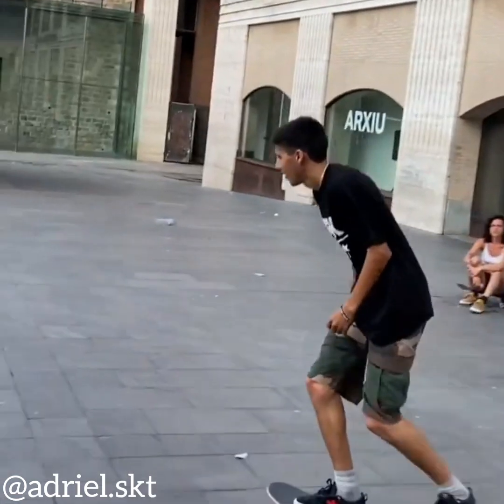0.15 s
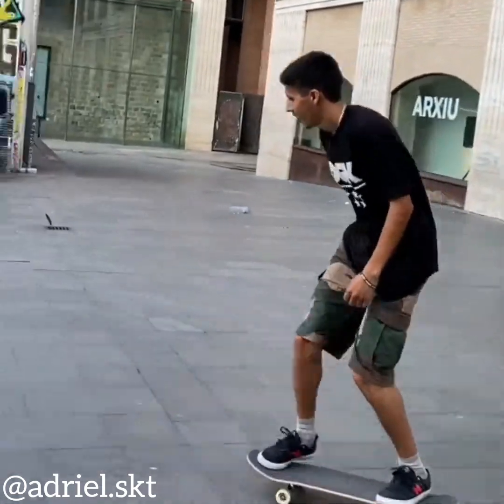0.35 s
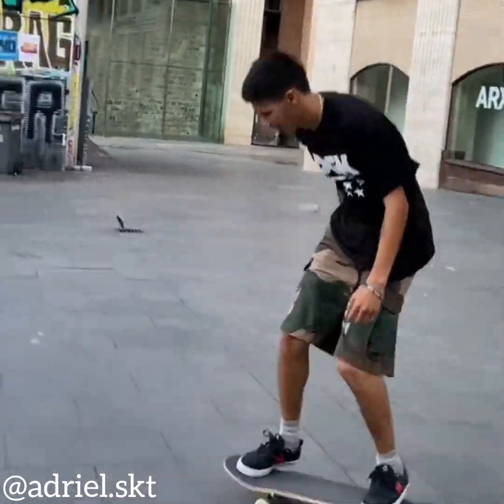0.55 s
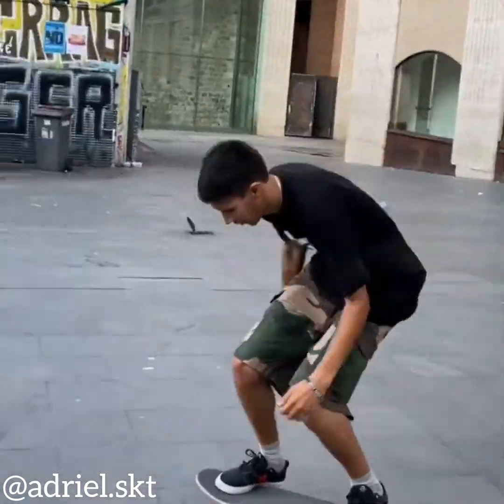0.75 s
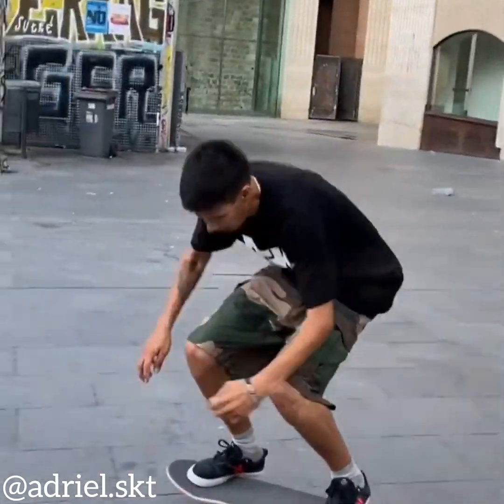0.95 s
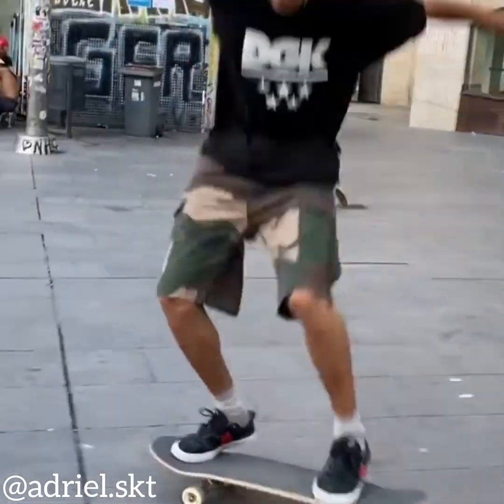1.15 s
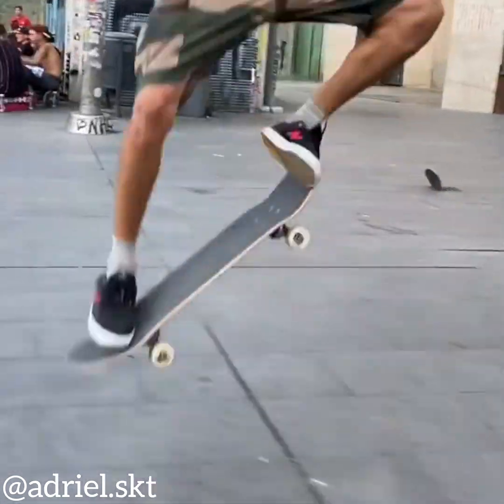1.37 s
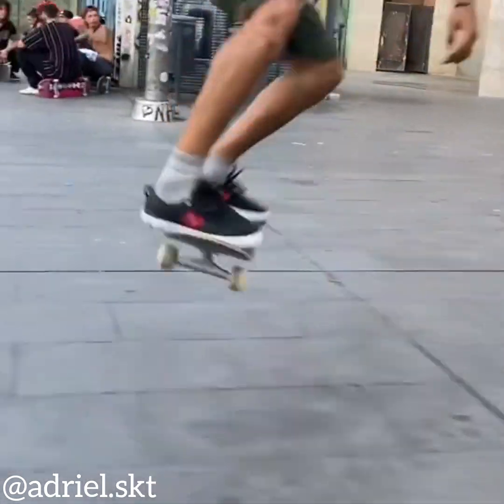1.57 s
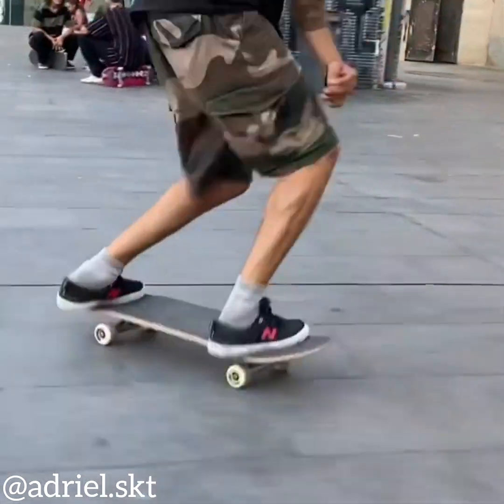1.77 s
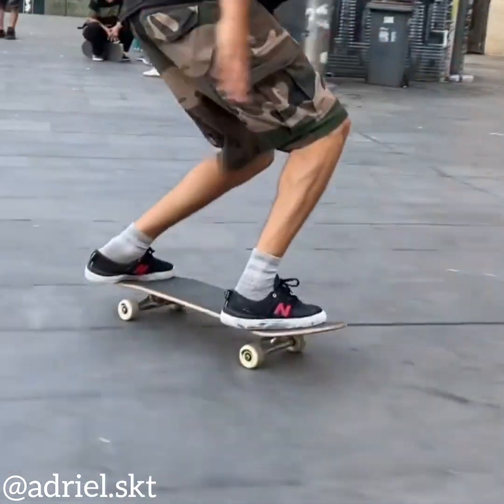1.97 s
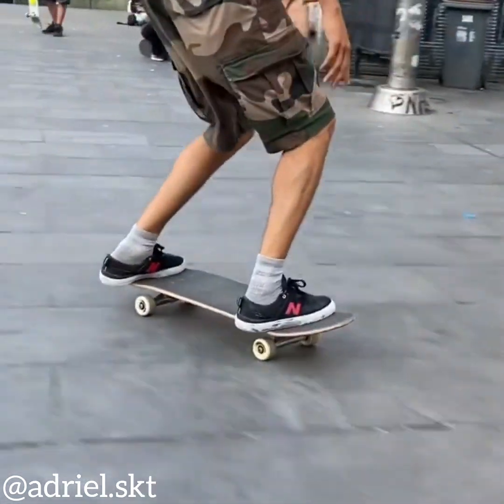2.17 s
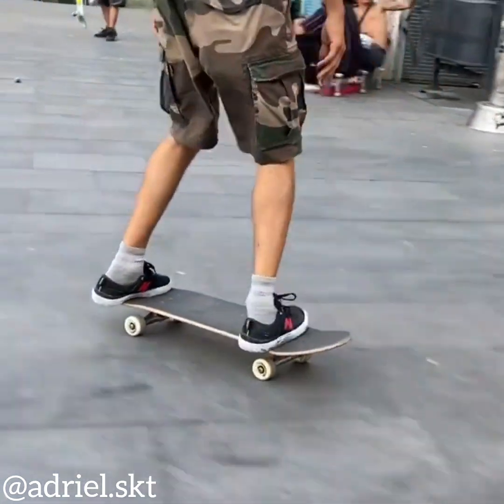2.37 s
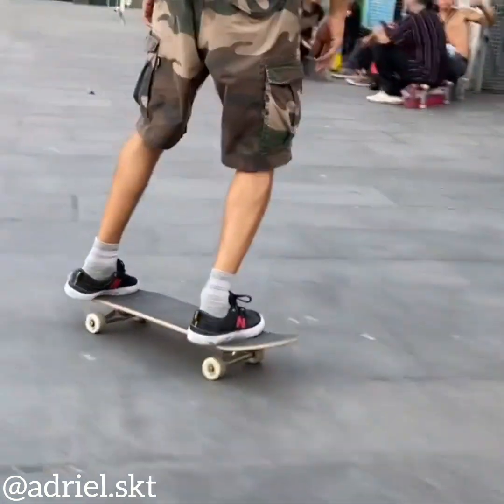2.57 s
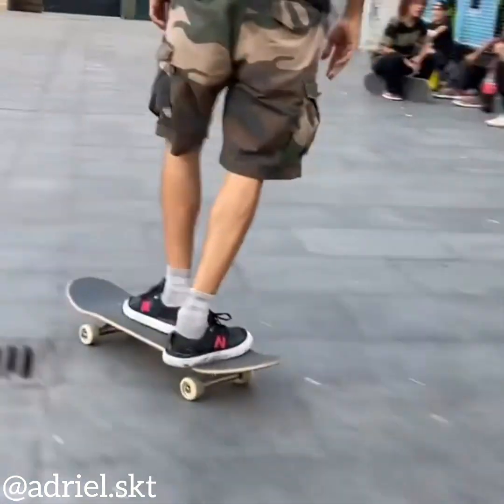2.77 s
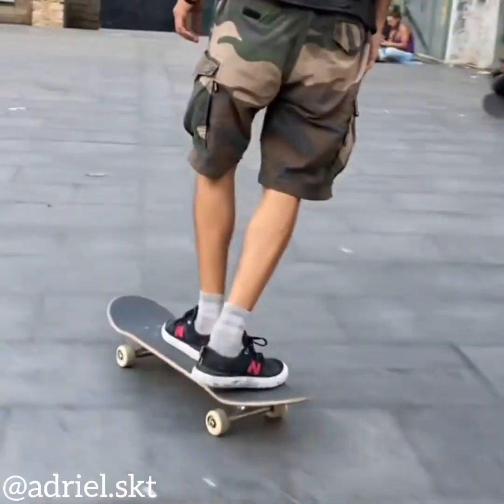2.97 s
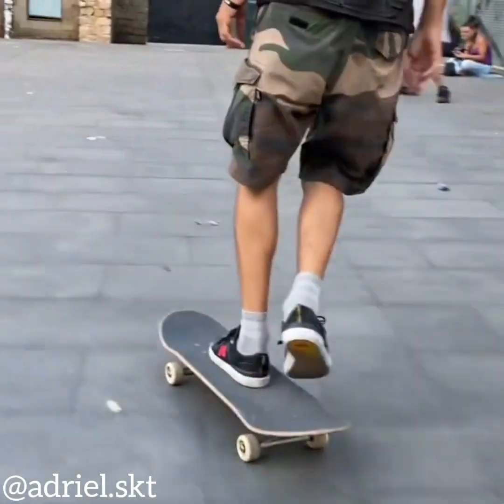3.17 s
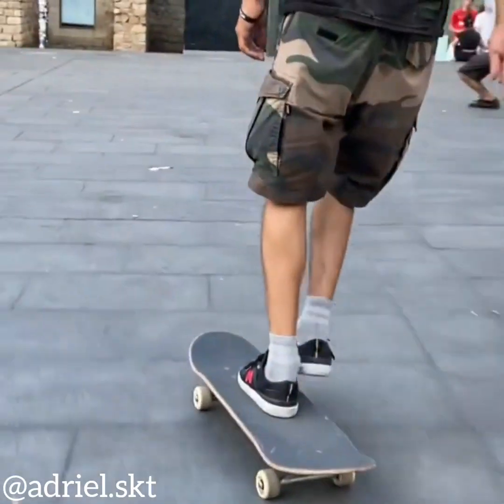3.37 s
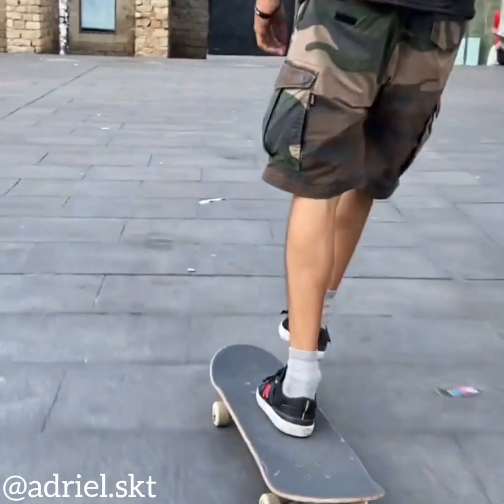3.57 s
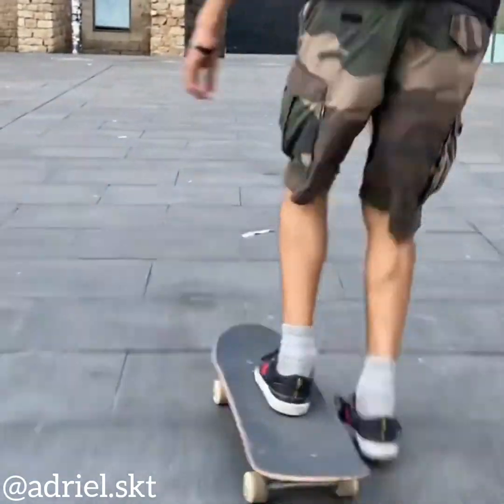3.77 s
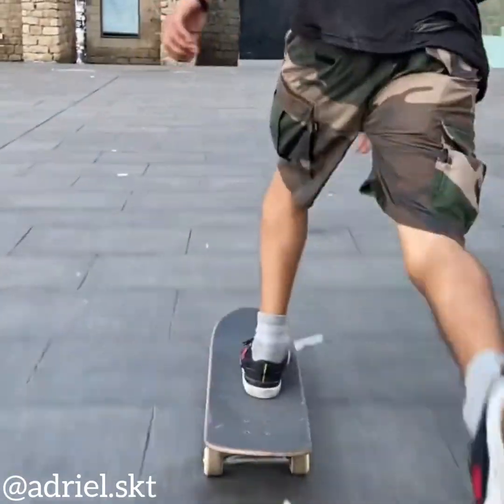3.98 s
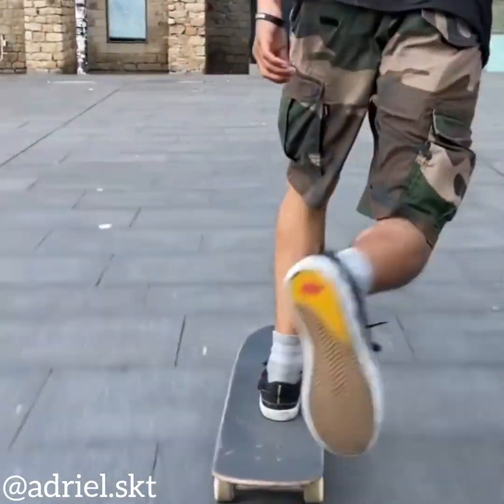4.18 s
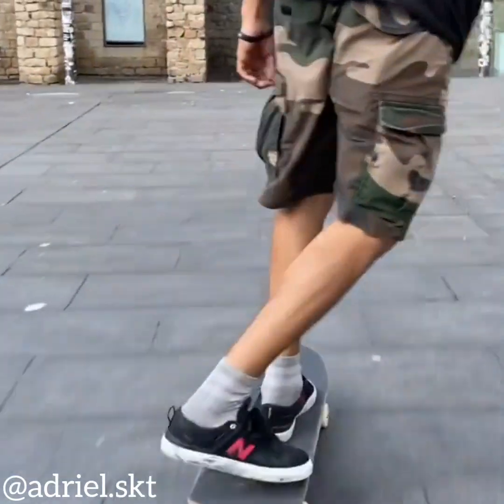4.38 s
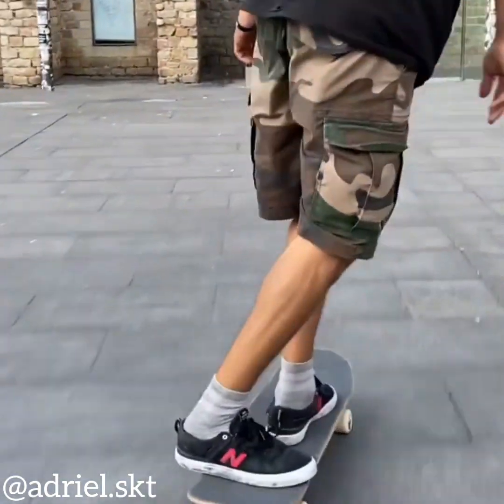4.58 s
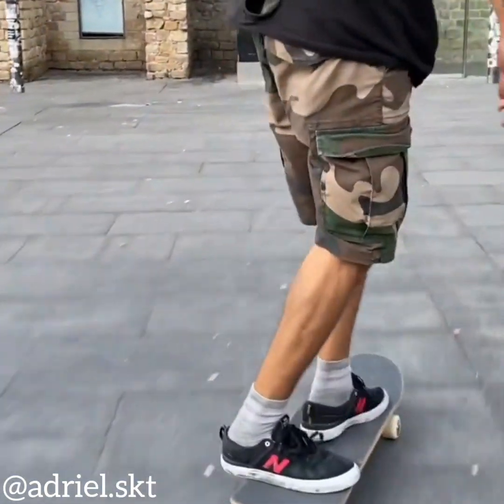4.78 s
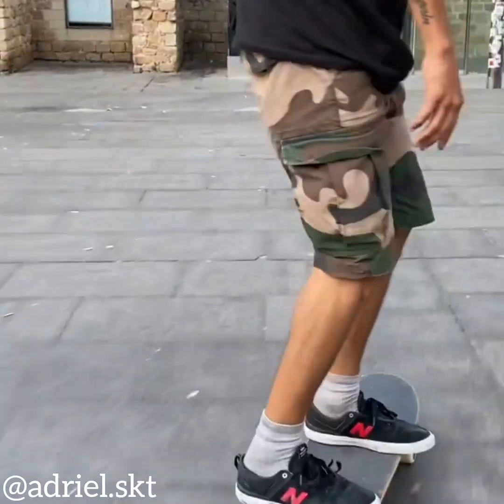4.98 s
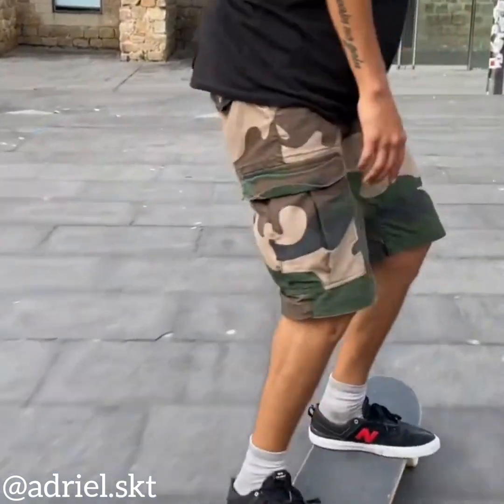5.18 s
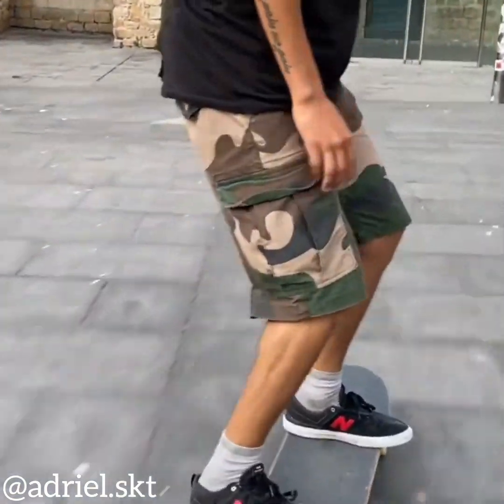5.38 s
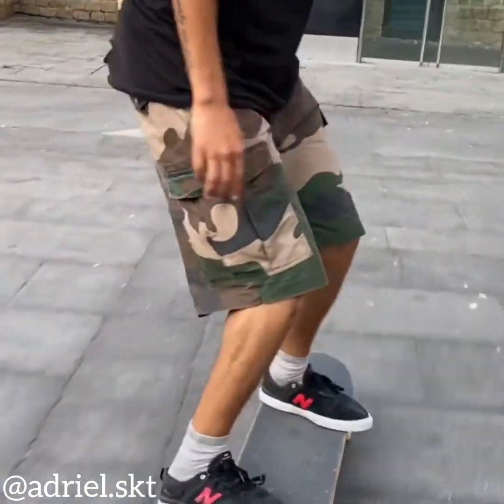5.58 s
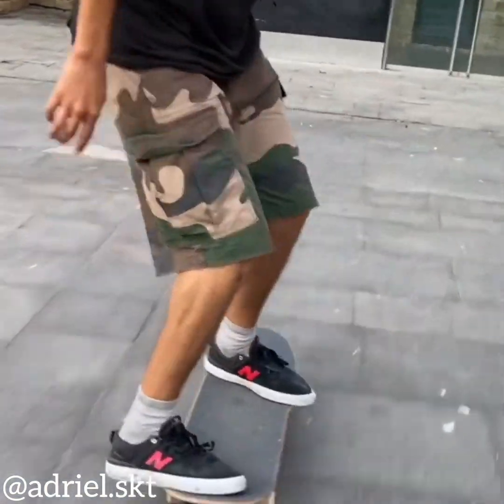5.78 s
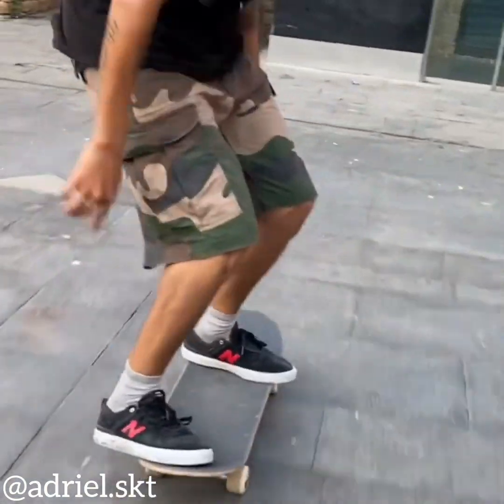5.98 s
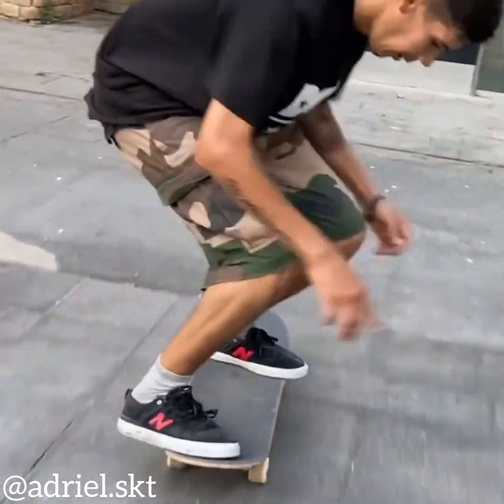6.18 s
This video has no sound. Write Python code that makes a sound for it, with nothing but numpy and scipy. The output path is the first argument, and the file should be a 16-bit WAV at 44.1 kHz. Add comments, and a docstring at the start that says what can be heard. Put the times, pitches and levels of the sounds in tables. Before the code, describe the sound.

Outdoors on a stone plaza, a handheld phone rides with one skateboard while following another. From 0 s hard wheels roll close below, a continuous grainy, woody rumble with light tile clicks around 0.1-0.5 s. Knocks return at about 1.2 s as the rolling swells; at 1.33 s the tail of the board ahead snaps, thin and bright. A few clicks follow, then at 1.76 s it slams flat: a sharp, loud metallic crack with a short woody rebound. Rolling drops briefly and recovers by 2.5 s, with small axle ticks near 2.45 s. From 3.3 to 4.5 s joints knock densely and heavily, with a harder clack at 3.9 s. Afterwards the rolling is duller and lower, with wind buffeting underneath. Metallic ticks and axle buzz from ahead appear at 5.0 s, strongest at 5.52 s, and knocks cluster near 5.7-6.1 s before it ends mid-roll at 6.2 s.

```python
"""Hard skateboard wheels roll over stone paving under a rider who holds a phone and follows a second board.
Stone grain is noise driving the modes of a wooden deck and metal trucks; tile joints knock them with short
bursts. Ahead, axles buzz and tick, a tail pops and a board slams down; the level dips just after and recovers.
Wind of the ride is lumpy low noise, and a thin hiss varies on top, strongest near 5 kHz. Left and right differ
in phase, likeness and level, set by frequency for the board below and the one ahead."""
import sys
import numpy as np
from scipy import signal
from scipy.fft import rfft, irfft, next_fast_len
from scipy.io import wavfile
from scipy.ndimage import uniform_filter1d

SR = 44100
rng = np.random.default_rng(int(sys.argv[2]) if len(sys.argv) > 2 else 0)


def persist_wave(psi):
    """Save psi, clipped to +-1, as 16-bit WAV."""
    counts = np.round(np.clip(psi, -1, 1) * 32767).astype(np.int16)
    wavfile.write(sys.argv[1], SR, np.atleast_2d(counts).T)


N = 275126
FFT_SIZE = next_fast_len(N + 4096)
HZ = np.fft.rfftfreq(FFT_SIZE, 1 / SR)

# resonances of the board's parts: pitch_hz, width_hz, relative level_db
FLEX_MODES = [(168.5, 93, -6), (239.2, 112, -1), (314, 77, 0)]
BELLY_MODES = [(348.3, 101.5, -2.15), (413, 108, -0.86), (488, 29.2, 2)]
DECK_MODES = [(494.3, 33, -0.73), (569.4, 38, -0.7), (636, 44.6, -0.58)]
RAIL_MODES = [(688.6, 72, 1.5), (818.4, 88, -0.58)]
NOSE_MODES = [(997, 110, 1.5), (1090, 67, 6.5), (1164, 172, 2), (1368, 143, -7)]
TRUCK_MODES = [(1424, 260, 6.5), (2290, 570, 3), (2610, 1230, 0), (3830, 1200, -5.5)]
# colour of the wheel hiss: pitch_hz, relative level_db
WHEEL_HISS = [(600, -80), (2500, -25), (4000, -2), (5500, 0), (7200, -3), (8600, .5), (9700, -3.5),
              (12500, -9), (14500, -15), (16000, -22)]
# level of the bass as heard: time_s, deck_flex_db, wind_db
BASS_LEVELS = [(0, -34, -48), (.15, -46.5, -68), (.35, -37, -49), (.5, -43, -75), (1.0, -38.5, -57),
               (1.5, -41.5, -79), (1.85, -46.5, -74), (2.1, -44.5, -86), (2.45, -43, -63),
               (2.8, -39.5, -89), (3.25, -43, -56), (3.45, -40, -61), (3.7, -35, -83), (4.1, -28.5, -54),
               (4.25, -29.5, -34.5), (4.45, -26.5, -39), (4.7, -35.5, -52), (4.9, -30, -39.5),
               (5.25, -31, -44.5), (5.4, -33.5, -34), (5.55, -29.5, -34.5), (5.66, -38.5, -40),
               (5.8, -29, -40), (6.05, -32, -35), (6.24, -38.5, -38)]


def gain_of(db):
    """Decibels to an amplitude factor."""
    return 10 ** (np.asarray(db) / 20)


def evened(x):
    """Scales to rms 1."""
    return x / np.sqrt(np.mean(abs(x) ** 2) + 1e-20)


def read(points):
    """A (pitch_hz, value) table at every frequency, linear in log frequency."""
    f, value = np.transpose(points)
    return np.interp(np.log(HZ + 1), np.log(f + 1), value)


def follow(table):
    """Every column of a (time_s, ..) table at every sample."""
    s, *columns = np.transpose(table)
    return [np.interp(np.arange(N) / SR, s, c) for c in columns]


def lumps(per_s, spread_db):
    """A gain of rms 1 that wanders at random about per_s times a second."""
    width = max(int(SR / per_s), 2)
    wander = uniform_filter1d(rng.standard_normal(N), width)
    wander = evened(uniform_filter1d(wander, width))
    return evened(gain_of(spread_db * wander))


def ringing(modes, reach=1.017):
    """Response of a body: damped modes of alternate sign, deaf well below and above them."""
    rings = sum((-1) ** k * gain_of(db) * width / (width + 1j * (HZ ** 2 - hz ** 2) / hz)
                for k, (hz, width, db) in enumerate(modes))
    low = 1j * HZ * reach / modes[0][0]
    high = 1j * HZ / reach / modes[-1][0]
    highpass = (low ** 2 / (1 + low + low ** 2)) ** 2
    return rings * highpass / (1 + high) ** 2


def through(response, force):
    """Passes a force through a response of unit noise gain."""
    return irfft(rfft(force, FFT_SIZE) * evened(response))[..., :N]


def shaken(response, power):
    """A part driven by a noisy force: a direct field and an unrelated, scattered one."""
    return through(response, np.sqrt(power) * rng.standard_normal((2, N)))


def bent(response, power, pitch):
    """A shaken part whose modes slide by the factor pitch over its mean, by uneven reading."""
    at, n = np.cumsum(pitch), np.arange(N)
    at = at * (N - 1) / at[-1]
    power_before = np.interp(n, at, power)  # lands in time once bent
    return np.array([np.interp(at, n, field) for field in shaken(response, power_before)])


def knocks(rows, column, rise_ms, jolt_db, jolt_ms, sharp):
    """Power envelope of all blows on one part: a quick rise, a jolt and a short rattle."""
    envelope = np.zeros(N + 4000)
    ms = np.arange(4000) * 1000 / SR
    rise = 1 - np.exp(-(ms / rise_ms) ** 2)
    jolt = rise * (1 + gain_of(2 * jolt_db) * np.exp(-(ms / jolt_ms) ** 2))
    for row in rows:
        rattle = np.exp(-(ms / row[-1]) ** sharp)
        envelope[round(row[0] * SR):][:4000] += gain_of(2 * row[column]) * jolt * rattle
    return envelope[:N]


def taps(rows, column, tap_db):
    """One clean one-sample push 1 ms into every blow, its energy in proportion to the blow's length."""
    force = np.zeros((2, N))
    for row in rows:
        at = round((row[0] + .001) * SR)
        force[:, at:at + 1] += gain_of(row[column] + tap_db) * np.sqrt(row[-1] * SR / 1000)
    return force


def struck(rows, metal, rise_ms, jolt_db, jolt_ms, sharp, lag_ms, wheel_db, tap_db, widening, metal_db):
    """Blows reach every part of a board; each rings in its own modes, the wood's widened."""
    # the whole board: pitch_hz, width_hz, relative level_db
    thud_modes = [(35, 40, 0), (62, 79, 0)]
    wood = [(FLEX_MODES, -12), (BELLY_MODES, -7), (DECK_MODES, -3), (RAIL_MODES, -3.5)]  # share_db
    deck, nose = (knocks(rows, column, rise_ms, jolt_db, jolt_ms, sharp) for column in (1, 2))
    trucks = knocks(rows, 3, rise_ms + lag_ms, jolt_db, jolt_ms + lag_ms, sharp)
    on_deck, on_nose, on_trucks = (taps(rows, column, tap_db) for column in (1, 2, 3))

    out = np.zeros((2, N))
    for modes, share_db in wood:
        part = ringing(modes * np.array([1, widening, 1]))
        out += shaken(part, gain_of(2 * share_db) * deck)
        out += through(part, gain_of(share_db) * on_deck)
    out += shaken(ringing(NOSE_MODES), nose) + through(ringing(NOSE_MODES), on_nose)
    out += shaken(ringing(TRUCK_MODES), gain_of(2 * metal_db) * nose)
    out += shaken(ringing(metal), trucks) + through(ringing(metal), on_trucks)
    out += shaken(gain_of(read(WHEEL_HISS)), gain_of(2 * wheel_db) * trucks)
    out += shaken(ringing(thud_modes), gain_of(2 * -30) * trucks)
    return out


def board():
    """Stone grain shakes every part of the rolling board with noise; tables set the level heard."""
    # level of the rolling as heard, dipping after the slam at 1.76 s and recovering:
    # time_s, deck_rails_nose_total_db, belly_db, rails_over_mid_deck_db
    roll = [(0, -18, -20, -2), (.13, -30, -29.5, -3.5), (.24, -21.5, -26, 1), (.3, -22.5, -24.5, 0),
            (.35, -19.5, -19.5, 1), (.41, -27.5, -39, -2), (.48, -17.5, -19, 5.5), (.6, -20.5, -25, -2),
            (.75, -21, -24.5, -1.5), (.9, -21.5, -22.5, 1.5), (.99, -23, -26, 3), (1.05, -21.5, -26, -4),
            (1.18, -20, -24.5, 3), (1.23, -15.5, -23, 2), (1.3, -17.5, -21.5, 2), (1.36, -13.5, -16, -0.5),
            (1.47, -14.5, -28, -6), (1.55, -17, -35, -2.5), (1.65, -20, -27.5, -3),
            (1.755, -16.5, -22.5, -5.5), (1.8, -26.5, -39, 4), (1.9, -23.5, -43, -1.5),
            (2.1, -20.5, -52, -6), (2.35, -23, -39.5, -1), (2.52, -19, -35, -2.5), (2.625, -20.5, -40, -1),
            (2.645, -15.5, -33, -5), (2.85, -17, -29, 2.5), (2.875, -22, -36, 6.5), (2.92, -19.5, -30, 0.5),
            (3.15, -18, -42, 0), (3.45, -18.5, -30.5, 0.5), (3.87, -15.5, -24.5, 2), (4.0, -21.5, -29, 2),
            (4.2, -19.5, -25.5, 7.5), (4.29, -19, -25, 10), (4.45, -25, -37, 4), (4.7, -25.5, -26, 10),
            (4.9, -27.5, -31.5, 9), (5.1, -25, -28.5, 9.5), (5.3, -25, -27, 11.5), (5.6, -25, -28.5, 6),
            (5.9, -27, -26.5, 18), (6.24, -25.5, -28.5, 2)]
    # level of the metal and hiss as heard: time_s, trucks_db, wheel_hiss_db
    treble = [(0, -31.5, -45), (.13, -43, -48), (.45, -35, -46), (.75, -40, -45), (1.15, -41.5, -52.5),
              (1.25, -38, -48.5), (1.29, -39, -43.5), (1.36, -34.5, -41.5), (1.41, -37.5, -51),
              (1.5, -38.5, -52), (1.75, -41, -50.5), (1.82, -40.5, -47), (2.1, -43.5, -49),
              (2.3, -41, -47.5), (2.45, -39, -42), (2.6, -35, -42), (2.66, -34, -40), (2.9, -35, -44.5),
              (3.45, -36, -42.5), (3.87, -27.5, -41.5), (4.0, -38, -48.5), (4.35, -37.5, -45),
              (4.55, -45, -51), (4.8, -43.5, -51), (5.0, -45.5, -52), (5.2, -41, -48.5), (5.38, -44, -50.5),
              (5.55, -38, -48.5), (5.78, -47.5, -50.5), (6.0, -38.5, -47), (6.24, -43, -50.5)]
    # the deck's pitch as the rider's weight shifts: time_s, relative pitch_factor
    stance = [(0, 1.0), (.5, .97), (1.0, .95), (1.35, 1.0), (1.6, 1.06), (1.9, 1.0), (2.05, 1.06),
              (2.35, .97), (2.65, 1.05), (3.0, 1.0), (3.4, 1.04), (3.6, .97), (3.8, 1.03), (4.2, .97),
              (4.8, 1.0), (5.5, .98), (6.24, 1.0)]
    level, belly, rails = follow(roll)
    trucks, hiss = follow(treble)
    flex = follow(BASS_LEVELS)[0]
    nose = -6.5 + 1.42 * rails  # dB over mid deck; leans further than the rails
    deck = level - 10 * np.log10(1 + gain_of(2 * rails) + gain_of(2 * nose))  # the three share the level

    stone = lumps(20, .8)  # rougher and smoother patches under all wheels
    bumps = stone * lumps(73, 0.96)
    grit = lumps(590, 0.26) * lumps(42, 1.12)
    patches = lumps(10.0, 0.84)
    sway = lumps(14, 1.8)  # the deck bends in bouts
    bumps = bumps * lumps(490, 1.28) * lumps(100, 0.8)  # single grains of stone

    parts = [(FLEX_MODES, flex, bumps * sway), (BELLY_MODES, belly, bumps),
             (DECK_MODES, deck, bumps), (RAIL_MODES, deck + rails, bumps), (NOSE_MODES, deck + nose, bumps),
             (TRUCK_MODES, trucks, bumps * grit * patches)]
    pitch = follow(stance)[0]
    body = sum(bent(ringing(modes), (gain_of(db) * grain) ** 2, pitch * lumps(3.5, .15))
               for modes, db, grain in parts)
    return body + shaken(gain_of(read(WHEEL_HISS)), (gain_of(hiss) * stone * grit * patches) ** 2)


def chips():
    """Small chips and cracks in the paving: light knocks at random moments."""
    per_s, spread_db, length_ms = 70, 4, 2
    mean_db = np.array((-42, -40, -53))  # deck, nose, trucks
    draws = rng.random((600, 2))
    start_s = np.cumsum(-np.log(1 - draws[:, 0])) / per_s
    size_db = spread_db * (2 * draws[:, 1] - 1)
    return [(s, *(db + mean_db), length_ms) for s, db in zip(start_s, size_db) if s < N / SR]


def joints():
    """Tile joints and chips knock the board below; its wood and rattling metal ring."""
    # tile joints, levels ahead of each part's share: start_s, deck_db, nose_db, trucks_db, length_ms
    joint_rows = [(0.093, -34, -43, -32, 2.4), (0.136, -38, -22, -24, 2.4), (0.18, -23, -22.5, -43, 9.4),
                  (0.262, -16.5, -23.5, -48, 6.9), (0.336, -20, -43, -54, 10), (0.363, -20, -38, -58, 6.6),
                  (0.481, -15, -28, -42, 8.1), (1.185, -21, -28, -42, 8.1), (1.218, -12, -33, -34, 4.1),
                  (1.477, -27, -37, -27.5, 2.4), (1.53, -10, -32, -30, 1.4), (1.843, -27, -24, -33, 5),
                  (1.905, -39, -22, -48, 2.4), (1.961, -31, -31, -37, 6.8), (2.017, -23, -41, -37, 5.1),
                  (2.11, -22.5, -32, -42.5, 16), (2.2, -27, -39, -45, 5.6), (2.289, -38, -26, -40, 3.6),
                  (2.408, -23.5, -23, -37, 8.1), (2.535, -18, -18, -26.5, 4.2), (2.636, -27, -31, -37, 4.2),
                  (2.722, -21, -25, -32, 3.5), (2.941, -28, -24, -51, 4.2), (3.079, -39, -34, -44, 2.5),
                  (3.137, -26, -23, -47, 7.9), (3.158, -25, -24, -42, 3.6), (3.21, -29, -24, -42, 6.9),
                  (3.302, -10.5, -32, -36, 5.6), (3.326, -28, -33, -49, 4.3), (3.386, -18, -28, -39, 10.5),
                  (3.477, -15, -16.5, -44, 5.1), (3.546, -32, -22, -40, 7.5), (3.576, -11, -22, -48, 6.2),
                  (3.635, -13, -26, -35.5, 14), (3.683, -36, -26, -41, 7.3), (3.712, -12, -20.5, -25, 5.9),
                  (3.795, -15, -24, -44, 9.1), (3.815, -14, -22, -30, 7.8), (3.951, -16, -22, -38, 13),
                  (3.967, -32, -23, -27.5, 5.8), (4.042, -9, -11, -32.5, 7.3),
                  (4.049, -26, -27, -26.5, 5.9), (4.133, -8.5, -13, -30, 8), (4.143, -29, -21, -32, 7.1),
                  (4.189, -32, -21, -34, 5.4), (4.22, -15, -18.5, -41, 14), (4.231, -18, -20, -35, 8.4),
                  (4.309, -8.5, -12, -38, 7.1), (4.352, -19, -11.5, -35, 3.2), (4.394, -6.5, -8, -35, 8.4),
                  (4.424, -34, -27, -43, 2.7), (4.48, -22, -11.5, -28.5, 3.5), (4.567, -17, -28, -44, 18),
                  (4.652, -22, -32, -47, 15), (4.738, -19, -38, -45, 12), (4.829, -20, -28, -47, 11),
                  (4.92, -21, -19, -45, 11), (4.997, -20, -30, -42, 9.7), (5.029, -33, -33, -35, 3.5),
                  (5.373, -25, -27, -47, 16), (5.1, -24, -32, -53, 9.1), (5.29, -20, -33, -43, 7.7),
                  (5.423, -20, -20, -42, 6.7), (5.55, -31, -27, -42, 2.6), (5.582, -41, -23, -48, 14),
                  (5.616, -41, -21.5, -40, 8.5), (5.712, -12, -13.5, -43, 5.8),
                  (5.808, -17, -13.5, -36, 3.9), (5.877, -21, -29, -61, 26), (5.907, -35, -18.5, -39, 9),
                  (5.938, -17, -17, -47, 4), (5.973, -10, -19, -31, 3.1), (5.981, -14, -23, -36, 5.5),
                  (5.785, -17.5, -30, -43, 6.5), (6.008, -16, -31, -44, 6.4), (6.034, -32, -36, -57, 3.8),
                  (6.07, -13, -14, -36, 7.1), (6.168, -16, -23.5, -38.5, 6.7)]
    # metal modes: pitch_hz, width_hz, relative level_db
    rattle_modes = [(1800, 350, 4.5), (2200, 790, 5), (2930, 780, 0.5), (3830, 750, -7), (5500, 560, 0.5)]
    # shape of a blow: rise_ms, jolt_over_rattle_db, jolt_ms, end_sharpness, metal_lag_ms,
    # wheel_hiss_under_trucks_db, clean_push_db, wood_mode_widening, trucks_under_nose_db
    joint_blow = (4, -0.5, 5, 2.5, 6.5, -1.5, -9.5, 1.92, -12)
    return struck(joint_rows + chips(), rattle_modes, *joint_blow)


def drops():
    """A wheel drops once onto a tile edge: clean pushes into the deck, damped by the rider's feet."""
    # drops: start_s, level_db
    drop_rows = [(1.218, -18), (1.347, -8), (1.412, -17), (1.534, -18), (2.635, -20), (2.943, -23),
                 (3.138, -19), (3.303, -23), (3.638, -18), (4.226, -13), (4.309, -15), (4.355, -16),
                 (4.572, -26), (4.656, -30), (4.742, -24), (4.923, -22), (4.976, -21), (5.016, -25),
                 (5.255, -21), (5.424, -18), (5.716, -24), (5.81, -15), (5.942, -19), (5.975, -17),
                 (6.072, -23), (6.172, -20)]
    # dull note of the loaded deck: pitch_hz, width_hz, relative level_db
    loaded_modes = [(396, 360, 0), (650, 440, 4), (1140, 540, -11), (2140, 480, -22)]
    rows = [(s, db, 3) for s, db in drop_rows]  # energy of 3 ms
    return through(ringing(loaded_modes), taps(rows, 1, 0))


def axles():
    """Axles of the board ahead buzz and tick over the stone as it rolls, flies, lands and comes nearer."""
    # level of the buzz: time_s, level_db
    buzz_level = [(0, -54), (.5, -37), (1.3, -64), (1.75, -69), (2.5, -81), (3.5, -52), (3.8, -40),
                  (4.2, -34), (4.45, -37.5), (4.65, -43), (4.85, -38.5), (5.1, -40.5), (5.3, -44),
                  (5.45, -37), (5.58, -34.5), (5.75, -37), (5.95, -33.5), (6.24, -40)]
    # axle modes: pitch_hz, width_hz, relative level_db
    axle_modes = [(880, 220, 2.7), (1700, 97, 1.8), (2244, 125, -1.6)]
    # ticks: start_s, level_db
    tick_rows = [(2.441, -47), (2.464, -34), (4.634, -39), (4.702, -44), (4.776, -45), (5.011, -25.5),
                 (5.116, -36), (5.146, -34), (5.195, -34), (5.243, -37.5), (5.267, -35), (5.381, -43),
                 (5.519, -19), (5.553, -27.5), (5.6, -26), (5.654, -47), (5.69, -36), (5.78, -40),
                 (5.884, -28), (5.941, -25), (5.978, -21.5), (6.015, -34), (6.199, -47)]
    response = ringing(axle_modes)
    buzz = gain_of(follow(buzz_level)[0]) * lumps(180, 4.5) * lumps(30, 1.5)
    rows = [(s, db, 3.5) for s, db in tick_rows]  # length in ms
    ticks = knocks(rows, 1, rise_ms=0.21, jolt_db=0, jolt_ms=0.68, sharp=0.83)
    return shaken(response, buzz ** 2 + ticks) + through(response, taps(rows, 1, -8.0))


def slams():
    """Blows on the board ahead ring its wood and cracking metal."""
    # blows, levels ahead of each part's share: start_s, deck_db, nose_db, trucks_db, length_ms
    slam_rows = [(1.329, -24, -19, -42, 4), (1.7612, -22, -22, -8, 3.7), (1.7665, -18, -17, -18, 3.1),
                 (1.7715, -22, -22.5, -23, 14.7), (1.7735, -30, -12, -26, 2.1), (1.786, -33, -23, -27, 1.8),
                 (3.894, -18, -16.5, -21.5, 6.4), (5.518, -34, -28.5, -35, 2.9)]
    # metal modes: pitch_hz, width_hz, relative level_db
    crack_modes = [(1670, 220, 13), (1970, 710, 3.5), (2560, 270, 9), (2980, 330, 6), (3690, 350, 8),
                   (3970, 350, 4.5), (4590, 520, 3), (5400, 3000, -7.5), (7900, 1500, 3), (10200, 6400, -6)]
    # shape of a blow: rise_ms, jolt_over_rattle_db, jolt_ms, end_sharpness, metal_lag_ms,
    # wheel_hiss_under_trucks_db, clean_push_db, wood_mode_widening, trucks_under_nose_db
    slam_blow = (3.1, 8, 2, 3, -1.5, -13.5, -10.5, 2.2, -12)
    return struck(slam_rows, crack_modes, *slam_blow)


def pop():
    """The tail ahead snaps on the stone, thin and bright: a noise burst and a push into its modes."""
    # the snap: start_s, level_db, length_ms
    snap = (1.3295, -17.5, 4.9)
    # tail modes: pitch_hz, width_hz, relative level_db
    tail_modes = [(2343, 170, 8.5), (3320, 600, -10.5), (4000, 380, -1.5), (5400, 900, -7),
                  (6800, 310, -3.5), (8100, 670, -3.5), (9900, 2000, -8)]
    burst = knocks([snap], 1, rise_ms=1.0, jolt_db=0, jolt_ms=1.4, sharp=2.5)
    return shaken(ringing(tail_modes), burst) + through(ringing(tail_modes), taps([snap], 1, -12))


def slaps():
    """The deck ahead slaps flat and rebounds: clean pushes into its woody modes."""
    # slaps: start_s, level_db
    slap_rows = [(1.7612, -12.5), (1.7645, -14.5), (1.7737, -17), (1.778, -19.5), (1.7862, -26)]
    # woody notes: pitch_hz, width_hz, relative level_db
    plank_modes = [(403, 110, -3), (555, 110, 3.5), (800, 260, -1), (1083, 80, 4.5), (1690, 190, -2.5),
                   (2560, 420, -6.5)]
    rows = [(s, db, 3) for s, db in slap_rows]  # energy of 3 ms
    return through(ringing(plank_modes, reach=2.1), taps(rows, 1, 0))


def leader():
    """The board ahead: its axles and the blows it takes."""
    return axles() + slams() + pop() + slaps()


def wind():
    """Lumpy low turbulence of the ride, with deep buffeting late on: noise in shared gusts."""
    # colour of the wind: pitch_hz, relative level_db
    wind_colour = [(15, -42), (30, -17), (50, 1), (75, 8), (105, 12.5), (150, 15), (250, -40), (500, -72)]
    # deep buffeting: time_s, level_db
    buffet_level = [(0, -80), (3.8, -82), (4.2, -56), (4.8, -64), (5.3, -51), (5.7, -45), (6.0, -45),
                    (6.24, -39)]
    # its colour: pitch_hz, relative level_db
    buffet_colour = [(12, -30), (25, -8), (40, -3), (55, 10), (80, -12), (140, -57)]
    gusts = lumps(13, 3.5)
    rumble = shaken(gain_of(read(wind_colour)), (gain_of(follow(BASS_LEVELS)[1]) * gusts) ** 2)
    buffeting = shaken(gain_of(read(buffet_colour)), (gain_of(follow(buffet_level)[0]) * gusts) ** 2)
    return rumble + buffeting


def thin_hiss():
    """Thin varying hiss: noise strongest near 5 kHz, with a weaker patch near 12.5 kHz."""
    # level: time_s, level_db
    hiss_level = [(0, -61), (.7, -66), (1.1, -56), (1.45, -51), (1.74, -72), (1.82, -55), (2.1, -71),
                  (2.45, -60), (2.9, -51), (3.3, -72), (3.7, -50), (3.98, -58), (4.05, -74), (4.3, -73),
                  (4.45, -56), (5.0, -60), (5.5, -73), (6.24, -81)]
    # colour: pitch_hz, relative level_db
    hiss_colour = [(3000, -28), (5000, 12), (8000, -5), (10000, -19), (12500, 2), (14500, -15),
                   (16000, -16)]
    return shaken(gain_of(read(hiss_colour)), gain_of(2 * follow(hiss_level)[0]))


def stereo(fields, lag, like, tilt_db):
    """Right is the direct field; left is it turned in phase by frequency and mixed with the scattered one."""
    direct, scattered = rfft(fields, FFT_SIZE)
    like = np.clip(like, 0, 1)
    left = like * np.exp(-1j * lag) * direct + np.sqrt(1 - like ** 2) * scattered
    return irfft(np.array([left * gain_of(tilt_db / 2), direct * gain_of(-tilt_db / 2)]))[:, :N]


def stereo_below(fields):
    """Stereo phase, likeness and level by frequency for the board below, wind and hiss."""
    # pitch_hz, left_phase_lag_rad
    below_lag = [(40, .2), (90, .5), (170, 1), (430, 2.1), (700, 2.6), (1050, 3.14), (1450, 3.5), (1800, 6),
                 (2700, 6.7), (3500, 8.4), (4300, 7.2), (5300, 9.4), (6300, 12.4), (7400, 12.7),
                 (8300, 15.7), (9600, 15.71), (10000, 19.5), (13800, 18.9), (14600, 21.9)]
    # pitch_hz, likeness_0_to_1
    below_like = [(30, .96), (60, .9), (200, .92), (800, .95), (1200, .85), (1550, .3), (2600, .85),
                  (3300, .5), (4000, .8), (5500, .4), (7300, .92), (7900, .7), (8400, .995), (9600, .995),
                  (9900, .5), (11800, .3), (13000, .92), (15000, .92)]
    # pitch_hz, left_minus_right_db
    below_tilt = [(60, 3.5), (150, 2.5), (380, 1.5), (950, -2), (2380, 0.5), (5980, 4.5), (9000, 3.4),
                  (15000, 1)]
    return stereo(fields, read(below_lag), read(below_like), read(below_tilt))


def stereo_ahead(fields):
    """Stereo phase and likeness by frequency for the board ahead, the two sides most alike near 9 kHz."""
    # pitch_hz, left_phase_lag_rad
    ahead_lag = [(100, 1), (6000, 1), (7500, .2), (8500, 3.14), (9600, 3.14), (10200, 5.5), (15000, 6)]
    # pitch_hz, likeness_0_to_1
    ahead_like = [(100, .68), (6000, .68), (8300, .99), (9700, .99), (10500, .6)]
    return stereo(fields, read(ahead_lag), read(ahead_like), tilt_db=3.5)


def scene():
    """The board below with wind and hiss, and the board ahead, as the phone turns in the hand."""
    # turn of the phone, on top of each stereo tilt: time_s, left_minus_right_db
    turn_table = [(0, -1.6), (1.2, -2), (2.2, -2.5), (3.2, -3.5), (4.2, -2.6), (5.2, -2.4), (5.7, -2),
                  (6.24, -2)]
    below = board() + joints() + drops() + wind() + thin_hiss()
    turn = gain_of(np.outer([.5, -.5], follow(turn_table)[0]))
    return turn * (stereo_below(below) + stereo_ahead(leader()))


def band_limit(x):
    """A steep low-pass at the top of the band."""
    return signal.sosfilt(signal.butter(12, 15710, fs=SR, output="sos"), x)


def record(dry):
    """The loudest peaks bend softly under full scale."""
    limited = dry / (1 + (dry / .95) ** 6) ** (1 / 6)
    return band_limit(limited)


dry = scene()
out = record(dry)
persist_wave(out)
```